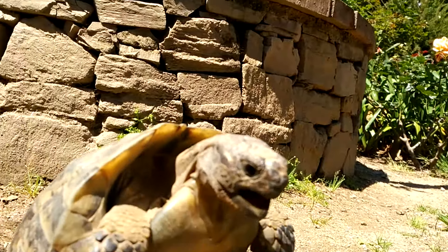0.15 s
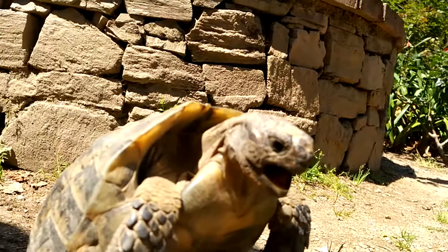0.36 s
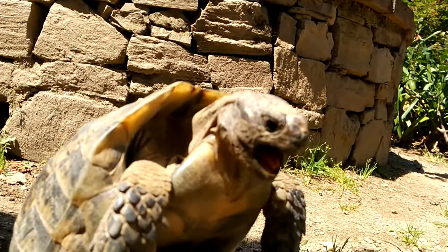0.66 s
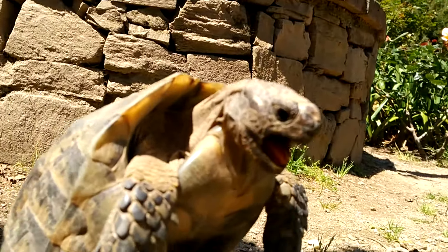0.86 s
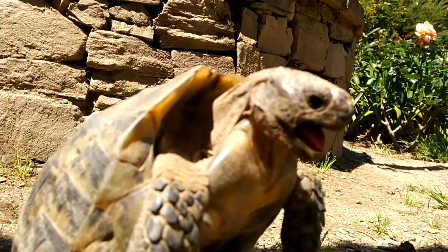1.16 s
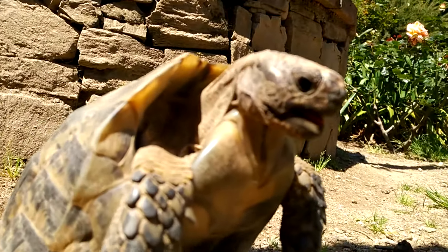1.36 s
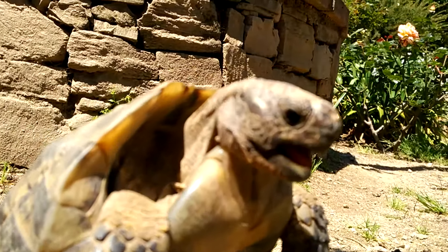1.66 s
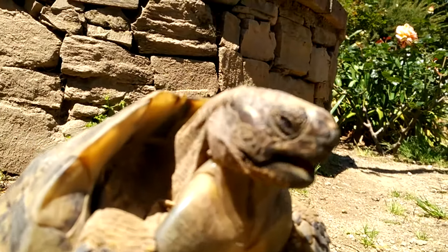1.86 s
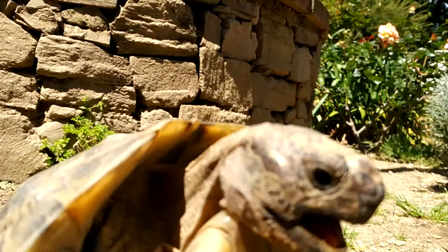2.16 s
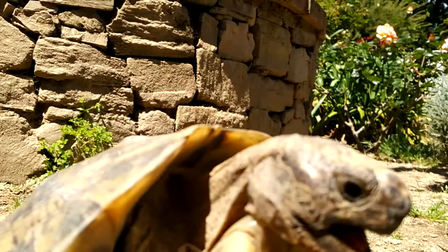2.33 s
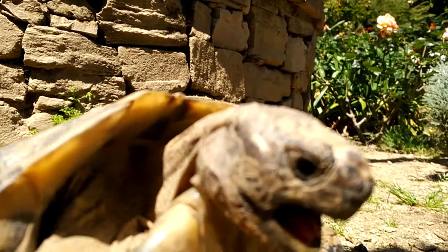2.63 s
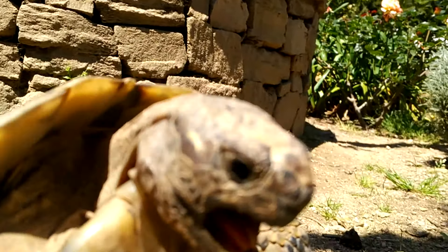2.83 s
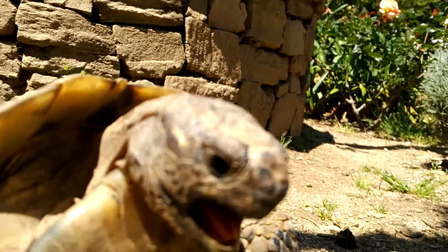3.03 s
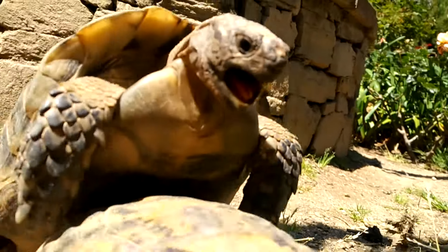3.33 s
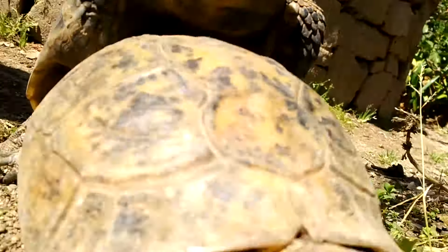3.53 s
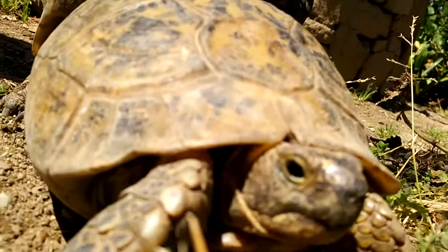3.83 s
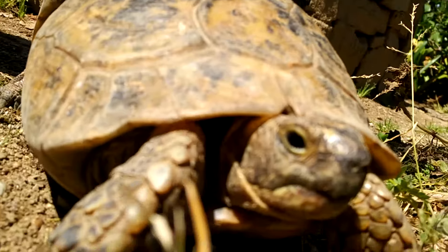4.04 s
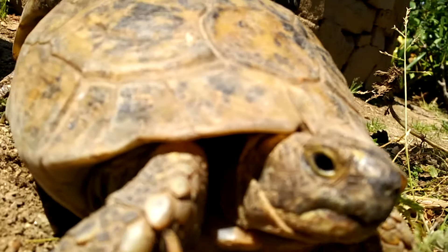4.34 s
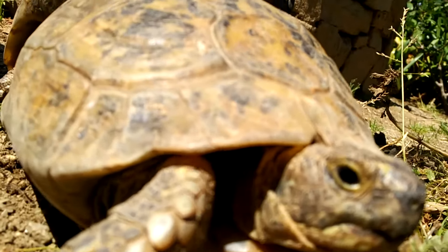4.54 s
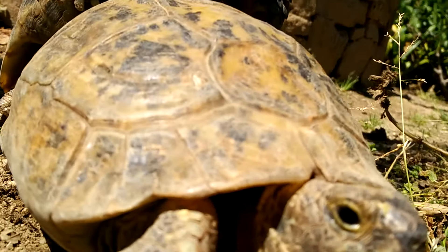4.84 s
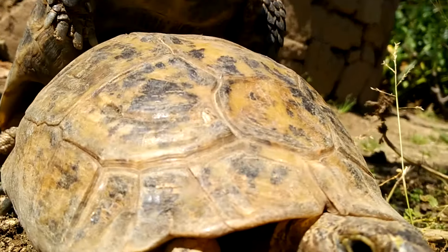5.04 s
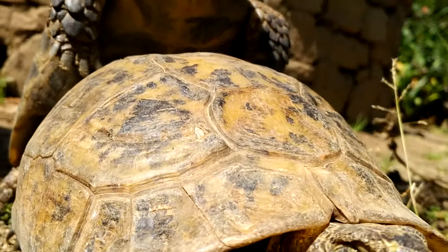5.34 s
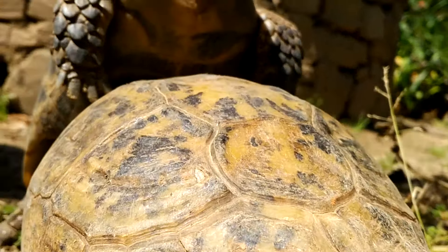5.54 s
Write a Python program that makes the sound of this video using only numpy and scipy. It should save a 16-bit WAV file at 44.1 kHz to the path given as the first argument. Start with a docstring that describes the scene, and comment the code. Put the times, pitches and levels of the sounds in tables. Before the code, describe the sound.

A tortoise gives two short, high, nasal squeaks about three seconds apart, with breathy hisses, dry grit ticks, light wind and distant low rumble.

```python
"""A tortoise squeaks twice in a sunny garden: gliding partials under a sliding mouth resonance.
It hisses during and after the squeaks, in noise swells; ground scuffs and the hoot's breathy body are made alike.
Ringing grains tick and spiky noise rustles, mostly at the left port of a phone. A sparrow chirps in burry sines,
another bird whistles, something hoots far off and a hollow knock rings.
Wind noise buffets the ports over distant traffic and a garden hush."""
import sys
import numpy as np
from scipy import signal
from scipy.fft import rfft, irfft
from scipy.io import wavfile
from scipy.ndimage import uniform_filter1d

SR = 44100
rng = np.random.default_rng(int(sys.argv[2]) if len(sys.argv) > 2 else 0)


def dump_mix(stems):
    """Bounce the given channels to the path in sys.argv[1] as a 16-bit WAV at rate SR."""
    frames = np.atleast_2d(stems).T  # one column per channel
    limited = np.clip(frames, -1, 1)  # hard clip at full scale
    pcm = np.round(limited * 32767).astype(np.int16)
    wavfile.write(sys.argv[1], SR, pcm)


N = 250929  # samples
RUSTLE_PAN_DB = 11  # left minus right, stalks and rasp of breath


def undb(db):
    """Decibels to amplitude."""
    return 10 ** (np.asarray(db) / 20)


def unit(x):
    """Scale to rms 1."""
    return x / np.sqrt(np.mean(x ** 2, axis=-1, keepdims=True))


def on_log(hz, table):
    """Read (hz, value) points on a log-frequency axis."""
    f, v = np.transpose(table)
    return np.interp(np.log(hz), np.log(f), v)


def colour(x, table):
    """Shape the spectrum by (hz, level_db) points, silent outside them; rms 1."""
    hz = np.fft.rfftfreq(x.shape[-1], 1 / SR) + 1  # offset avoids log 0
    band = (hz > table[0][0]) & (hz < table[-1][0])
    gain = undb(on_log(hz, table)) * band
    return unit(irfft(rfft(x) * gain, x.shape[-1]))


def noise(table, size, likeness=0.):
    """Two-port coloured noise of rms 1; likeness 1 is the same sound at both."""
    a, b = rng.standard_normal((2, size))
    like = np.clip(likeness, 0, 1)
    right = like * a + np.sqrt(1 - like ** 2) * b
    return colour(np.array([a, right]), table)


def pan(db):
    """Gains of the left and right port, db apart, whose mean is 1."""
    g = undb(db)
    return np.array([2 * g / (1 + g), 2 / (1 + g) + 0 * g])


def walk(rate_hz, size):
    """Random levels, each held 1 / rate_hz then slewed; rms 1."""
    k = int(SR / rate_hz)
    held = np.repeat(rng.standard_normal(size // k + 1), k)[:size]
    return unit(uniform_filter1d(held, k))


def add(out, start_s, x):
    """Mix x into out at start_s."""
    i = max(int(start_s * SR), 0)
    out[:, i:i + x.shape[-1]] += x[..., :N - i]


def follow(rows):
    """Columns of a table sample by sample over its span."""
    s, *columns = np.transpose(rows)
    t = np.arange(s[0], s[-1], 1 / SR)
    return [np.interp(t, s, c) for c in columns]


def everywhere(rows):
    """Columns of a table sample by sample over the whole scene."""
    s, *columns = np.transpose(rows)
    return [np.interp(np.arange(N) / SR, s, c) for c in columns]


def wind():
    """Low turbulence noise, nearly unrelated at the ports; the left one is exposed, the right sheltered."""
    # gusts at the left port: time_s, mean_level_db
    gusts = [(0.0, -62), (0.14, -48.5), (0.25, -54.5), (0.42, -54), (0.51, -36.5), (0.7, -41.5),
             (0.93, -54.5), (1.1, -46), (1.27, -57), (1.75, -57), (1.93, -48), (2.45, -51), (2.6, -66),
             (3.09, -55), (3.6, -73), (4.2, -56), (4.91, -68), (5.3, -64), (5.45, -49), (5.69, -55)]
    # wind spectrum: hz, level_db
    wind_spectrum = [(25, -48), (35, -6), (50, 1.5), (75, 2.5), (100, -11.5), (200, -25), (500, -73)]
    lee_db, lee_share = -66, .25  # right port: resting level, share of each gust's dB followed
    left_db = everywhere(gusts)[0]
    right_db = lee_db + lee_share * (left_db - lee_db)
    ports_db = np.array([left_db + 2.74 * walk(8, N), right_db + 3.0 * walk(4.1, N)])
    return undb(ports_db) * noise(wind_spectrum, N, likeness=.05)


def traffic():
    """Distant rumble in two bands of noise that swell apart, nearly the same at both ports."""
    # rumble levels: time_s, low_mean_db, upper_mean_db
    rumble = [(0.0, -61.5, -64), (0.15, -55.5, -72.5), (0.4, -58, -65), (0.52, -49, -67.5), (0.7, -51, -61),
              (0.81, -46.5, -64), (0.92, -54.5, -68.5), (1.33, -53, -68), (1.77, -56.5, -64.5),
              (2.19, -54.5, -67.5), (2.5, -54.5, -67), (2.7, -56.5, -65), (3.7, -58, -67),
              (3.96, -61.5, -69.5), (4.39, -56.5, -63.5), (4.86, -54.5, -68.5), (4.95, -49.5, -65),
              (5.05, -55, -62), (5.25, -52, -60.5), (5.36, -49, -60.5), (5.47, -50, -61),
              (5.69, -47.5, -61)]
    # low band: hz, level_db
    low_spectrum = [(60, -11), (90, -5), (125, -3), (160, -7), (210, -17.5), (260, -40)]
    # upper band: hz, level_db
    top_spectrum = [(160, 0.5), (210, -2), (330, 3), (400, -9), (480, -13.5), (700, -23), (1100, -24)]
    low_db, top_db = everywhere(rumble)
    low = undb(low_db + 1.4 * walk(7.4, N)) * noise(low_spectrum, N, likeness=.87)
    top = undb(top_db + 2.37 * walk(18, N)) * noise(top_spectrum, N, likeness=.86)
    return pan(1.6)[:, None] * (low + top)


def hush():
    """Steady diffuse garden noise."""
    # hush spectrum: hz, level_db
    hush_spectrum = [(240, -43), (400, -0.5), (625, -5.5), (2570, -10.5), (4410, -10), (4830, -9),
                     (7670, -9.5), (10600, -19), (15100, -13.5), (15800, -15)]
    return undb(-66.5) * noise(hush_spectrum, N, likeness=.099)


def rustle():
    """Dry stalks and grit crackle as spiky noise; dull and bright stalks stir apart."""
    # rustle: time_s, mean_level_db
    rustle_level = [(0.0, -58.5), (0.05, -52.5), (0.2, -68), (0.84, -73), (1.1, -78), (1.27, -54),
                    (1.42, -64), (2.26, -66), (2.42, -66.5), (2.55, -74), (2.84, -62.5), (3.09, -61.5),
                    (3.26, -69), (3.91, -71), (4.14, -71.5), (4.33, -58.5), (4.6, -59), (4.69, -71),
                    (4.88, -72.5), (5.69, -62)]
    # rustle spectrum: hz, level_db
    rustle_spectrum = [(2500, -11), (4500, -4), (5600, 1), (7000, 2.5), (9000, 1.5), (12000, -3.5),
                       (15900, -16)]
    spike_db, stir_db, split_hz = 3, 2, 7500
    spikes = rng.standard_normal((2, N)) * undb(spike_db * rng.exponential(size=(2, N)))
    crackle = colour(spikes, rustle_spectrum)
    dull = signal.sosfilt(signal.butter(4, split_hz, fs=SR, output="sos"), crackle)
    bright = crackle - dull
    stirred = dull * undb(stir_db * walk(25, N)) + bright * undb(stir_db * walk(25.04, N))
    level_db = everywhere(rustle_level)[0] + 1.24 * walk(60, N)
    return undb(level_db) * pan(RUSTLE_PAN_DB)[:, None] * stirred


def snap(bright_db):
    """One grain of grit rings its decaying modes, peak 1; each grain is sized and struck differently."""
    # grain modes: nominal_hz, nominal_level_db, t60_s
    modes = [(3520, -33, 0.0022), (6000, -6, 0.0013), (7670, 5, 0.0023), (9460, 11, 0.0055),
             (10840, 20, 0.0025), (13880, 14.5, 0.0024), (16000, 4, 0.00093)]
    spread_db, detune = 3, .06  # rms scatter of level and, as a fraction, of pitch
    t = np.arange(int(.008 * SR)) / SR
    ring = np.zeros(len(t))
    for (hz, db, t60_s), (c, d) in zip(modes, rng.standard_normal((len(modes), 2))):
        gain = undb(db + spread_db * c + bright_db * (hz > 8000))
        decay = np.exp(-np.log(1000) * t / t60_s)
        ring += gain * decay * np.sin(2 * np.pi * hz * (1 + detune * d) * t)
    ring = ring * np.minimum(t / 0.000074, 1)  # contact builds over a few samples
    return ring / np.abs(ring).max()


def ticks():
    """Grains of grit snap at set moments, and more snap faintly at chance moments."""
    # snaps: start_s, peak_db (mean of ports), bright_db (modes above 8 kHz)
    snaps = [(0.0577, -23.5, -12), (0.0641, -42, -9), (0.1641, -43, -11), (0.3684, -34.5, -55),
             (1.0811, -32.5, -24), (1.5142, -42, -22), (2.0408, -42.5, -19), (2.1496, -38, -23),
             (2.1712, -38, -6), (2.2187, -33.5, -12), (2.4325, -39.5, -23), (2.607, -43, -3),
             (2.8644, -42.5, -15), (2.997, -44, -7), (3.0796, -43, -18), (3.5889, -31, -11),
             (3.61, -41, -25), (3.6904, -40, -14), (3.8662, -41, -11.5), (4.1247, -28, 0),
             (4.2143, -44.5, -37), (4.2683, -36.5, -17), (4.303, -22, -16.5), (4.3483, -31.5, -16),
             (4.5797, -24.5, -3), (5.2271, -31.5, 4), (5.4001, -41, -21), (5.534, -25.5, 10),
             (5.6044, -37, -15), (5.6487, -39.5, -26)]
    faint_count, faint_db, faint_bright_db = 10, -47, -14
    faint = [(s, faint_db, faint_bright_db) for s in rng.random(faint_count) * N / SR]
    out = np.zeros((2, N))
    for start_s, db, bright_db in snaps + faint:
        add(out, start_s, undb(db) * pan(17)[:, None] * snap(bright_db))
    return out


def puffs(rows, grain_db):
    """Swells of noise in one broad resonance, their graininess set by grain_db."""
    taper, waver_db = 1.3, 1.2  # taper above 1 points the swells
    out = np.zeros((2, N))
    for start_s, top_s, end_s, db, hz, width_hz, pan_db, likeness in rows:
        t = np.arange(start_s, end_s, 1 / SR)
        rise_fall = np.interp(t, [start_s, top_s, end_s], [0, 1, 0])
        swell = np.sin(np.pi / 2 * rise_fall) ** taper
        swell = swell * undb(waver_db * walk(29.76, len(t)))
        f = np.geomspace(120, 15900, num=80)
        resonance = np.c_[f, -30 * np.log10(1 + (2 * (f - hz) / width_hz) ** 2)]
        grain = undb(grain_db * walk(300, len(t)))
        hiss = noise(resonance, len(t), likeness)
        add(out, start_s, undb(db) * swell * grain * pan(pan_db)[:, None] * hiss)
    return out


def scuffs_and_hoot_breath():
    """Feet and shells scuff the dry ground; the low swell at 3.81 s is the hoot's breathy body: grainy noise."""
    # swells: start_s, peak_s, end_s, level_db, centre_hz, width_hz (at -9 dB), left_minus_right_db, likeness
    swell_rows = [(0.04, 0.06, 0.09, -43.5, 10500, 9300, 17, 0.52),
                  (2.25, 2.262, 2.277, -52.5, 3080, 4000, 7.6, 0.85),
                  (2.85, 3.0, 3.18, -71, 8350, 6100, 14, 0.28),
                  (3.18, 3.222, 3.26, -51.5, 7800, 9300, 7.6, 0.31),
                  (3.48, 3.515, 3.6, -60, 6200, 5650, 5.6, 0.12),
                  (3.81, 3.88, 4.07, -59.5, 387, 850, 2.4, 0.52),
                  (5.21, 5.232, 5.26, -60, 5460, 4000, 2.7, 0.55),
                  (5.64, 5.65, 5.66, -56.5, 6400, 6560, 6.8, 0.45)]
    return puffs(swell_rows, grain_db=3)


def squeak(rows, second_db, upper_db, rasp_db):
    """Clean partials; a mouth resonance slides over the upper ones; breath rasps in puffs each cycle."""
    # throat, third partial up: hz, gain_db
    throat_gain = [(2130, -4), (2260, 2.5), (2340, -12), (2800, 3), (3100, -2), (3600, 1.5), (3900, -5.5),
                   (4300, -1), (4700, 7.5), (5050, -3), (5450, -5.5), (7000, -19), (7800, -6), (8600, -13),
                   (9500, -28)]
    # the hand shades the ports: hz, left_minus_right_db
    hand_shade = [(700, 0.5), (1500, 5), (2300, 1), (3100, 9.5), (3900, 17.5), (4600, -2.5), (5500, -2.5),
                  (7000, 10), (9000, 25)]
    # rasp spectrum: hz, level_db
    rasp_spectrum = [(5200, -47), (5800, 7), (8000, 4), (11000, 5), (14000, 4), (15900, -8)]
    jitter, shimmer_db = .0015, 2  # rms: fraction of pitch, level of upper partials
    onset_bright_db, onset_fade_s = 3.5, 0.07  # extra edge at the start
    upper_fade_db_per_s = 12  # throat's share of the upper partials tires sooner than the fundamental
    mouth_width_hz, mouth_skirt = 1300, 1.5
    second_lag_rad = 0.39 * np.array([[0], [1]])  # second partial is later still at the shaded right port
    hz, level_db, mouth_hz, mouth_db = follow(rows)
    hz, mouth_hz = (uniform_filter1d(c, int(0.005 * SR), mode="nearest") for c in (hz, mouth_hz))
    size = len(hz)
    t = np.arange(size) / SR
    onset = np.exp(-t / onset_fade_s)
    phase = 2 * np.pi * np.cumsum(hz * (1 + jitter * walk(154.6, size))) / SR

    rasp = undb(level_db + rasp_db) * pan(RUSTLE_PAN_DB)[:, None] * noise(rasp_spectrum, size, 0.28)
    out = rasp * (1 + 0.41 * np.cos(phase)) * undb(2.0 * walk(75, size))
    for k in range(1, 14):
        f = k * hz
        if k > 2:
            mouth = undb(mouth_db) / (1 + (2 * (f - mouth_hz) / mouth_width_hz) ** 2) ** mouth_skirt
            tilt_db = upper_db + onset_bright_db * onset - upper_fade_db_per_s * t
            throat = undb(level_db + tilt_db + on_log(f, throat_gain))
            gain = (throat + mouth) * undb(shimmer_db * walk(46.3, size))
        else:
            gain = undb(level_db + second_db * (k == 2))
        tone = np.sin(k * phase + k * k / 3 - second_lag_rad * (k == 2))
        out = out + np.sqrt(2) * gain * pan(on_log(f, hand_shade)) * tone
    return out


def squeaks():
    """Each squeak of the tortoise follows its own pitch and mouth track, with its own colour."""
    # one track per squeak: time_s, pitch_hz, fundamental_db, mouth_hz, mouth_peak_db
    tracks = [
        [(0.972, 856, -116, 5650, -94), (0.986, 818, -57, 5930, -43), (1.008, 782, -53, 5560, -40.5),
         (1.045, 776.2, -50.5, 6840, -49), (1.16, 780.8, -51, 7240, -51.5), (1.19, 777, -51, 6240, -52.5),
         (1.24, 773, -51.5, 6040, -52), (1.263, 754, -51, 6100, -53), (1.285, 725.5, -53, 5850, -53),
         (1.333, 705, -56.5, 5650, -53), (1.39, 713.4, -55, 5660, -72), (1.42, 702, -56, 5650, -79),
         (1.458, 677, -73, 5620, -85)],
        [(4.358, 830, -63.5, 6300, -66), (4.374, 746, -48, 6400, -40.5), (4.4, 714, -48, 6120, -42),
         (4.445, 697.5, -50, 6600, -49.5), (4.49, 713, -49.5, 6800, -47), (4.52, 724, -50, 6130, -50.5),
         (4.552, 744, -52.5, 5930, -50.5), (4.576, 721, -55, 6160, -59), (4.622, 695, -79, 6200, -79)],
    ]
    # colour per squeak, against its fundamental: second_partial_db, upper_partials_db, rasp_db
    shades = [(6.5, -5, -8.5), (-2, -12, -6.5)]
    out = np.zeros((2, N))
    for rows, shade in zip(tracks, shades):
        add(out, rows[0][0], squeak(rows, *shade))
    return out


def hisses():
    """Breath through the tortoise's nose and mouth: slightly grainy noise swells."""
    # hisses: start_s, peak_s, end_s, level_db, centre_hz, width_hz (at -9 dB), left_minus_right_db, likeness
    hiss_rows = [(0.99, 1.12, 1.25, -53, 6000, 2050, 3, 0),
                 (1.12, 1.42, 2.05, -58.5, 4540, 2770, -0.5, 0.06),
                 (2.14, 2.235, 2.43, -53.5, 5670, 1290, -1.5, 0.1),
                 (2.05, 2.25, 2.4, -60.5, 7440, 3640, 9, 0.2), (4.5, 4.6, 4.72, -63.5, 8100, 4000, 10, 0.1),
                 (5.4, 5.54, 5.63, -55, 6800, 2470, 7.5, 0.4)]
    return puffs(hiss_rows, grain_db=1.9)


def sparrow():
    """Burry gliding sines, three strokes to a chirp, smeared by echoes from leaves and walls."""
    # one track per stroke: time_after_start_s, hz (before pitch_factor), level_db (relative to chirp)
    strokes = [
        [(-.006, 3700, -2.5), (.01, 4490, 7.5), (.026, 4484, 11), (.04, 4136, 9), (.056, 4070, 5),
         (.064, 4000, -2)],
        [(.05, 3150, -7), (.068, 3600, 5), (.085, 4120, 9), (.1, 3725, -3), (.14, 4010, -2.5), (.16, 3900, -15)],
        [(.09, 2990, -11), (.1, 3100, 0), (.115, 3700, 1.5), (.13, 2900, -7.5), (.15, 3247, -17)],
    ]
    # chirps: start_s, level_db, pitch_factor, echo_db
    chirps = [(2.655, -72.5, 0.97, 10), (4.082, -62.5, 1.0, 5), (4.85, -62, 0.99, 5)]
    burr_hz, burr = 120, .7  # rms fast unsteadiness of pitch and, as a fraction, of size
    bush_t60_s = .19
    out = np.zeros((2, N))
    t = np.arange(int(.3 * SR)) / SR
    for start_s, chirp_db, pitch, echo_db in chirps:
        echo = rng.standard_normal((2, len(t))) * np.exp(-np.log(1000) * t / bush_t60_s)
        echo *= undb(echo_db) / np.sqrt(np.sum(echo ** 2, axis=1, keepdims=True))
        echo[:, 0] = 1  # direct sound
        for rows in strokes:
            hz, db = follow(rows)
            level = undb(db + chirp_db) * (1 + burr * walk(300, len(hz)))
            burry_hz = pitch * hz + burr_hz * walk(600, len(hz))
            tone = level * np.sin(2 * np.pi * np.cumsum(burry_hz) / SR)
            smeared = signal.fftconvolve(echo, tone[None], axes=1)
            add(out, start_s + rows[0][0], pan(-1.6)[:, None] * smeared)
    return out


def hoot():
    """Far husky low tone: a few partials, each roughened in level."""
    # hoot: time_s, pitch_hz, level_db
    hoot_track = [(3.811, 280, -69), (3.848, 377.4, -61.5), (3.858, 386, -61), (3.884, 367.4, -54.5),
                  (3.964, 384.4, -65), (4.05, 376, -76)]
    # partials from the fundamental up: gain_db
    partials_db = [4.5, -11.5, -24, -26]
    rough = undb(-8.5)  # times the partial number
    hz, db = follow(hoot_track)
    phase = 2 * np.pi * np.cumsum(hz) / SR
    tone = np.zeros(len(hz))
    for k, partial_db in enumerate(partials_db, 1):
        tone += undb(partial_db) * (1 + k * rough * walk(149.7, len(hz))) * np.sin(k * phase)
    out = np.zeros((2, N))
    add(out, hoot_track[0][0], np.sqrt(2) * undb(db) * tone * pan(1.2)[:, None])
    return out


def knock():
    """One hollow knock: a soft-edged decaying sine."""
    # knock: level_db (before attack and decay), hz, t60_s
    knock_ring = (-43, 265, .16)
    db, hz, t60_s = knock_ring
    t = np.arange(int(t60_s * SR)) / SR
    envelope = np.minimum(t / .012, 1) * np.exp(-np.log(1000) * t / t60_s)
    out = np.zeros((2, N))
    add(out, 4.988, undb(db) * envelope * np.sin(2 * np.pi * hz * t))
    return out


def whistle():
    """A second bird, far off: one thin gliding sine."""
    # whistle: time_s, pitch_hz, peak_db (mean of ports)
    whistle_track = [(5.0, 6300, -84), (5.012, 6500, -61), (5.02, 7150, -70), (5.059, 7030, -70),
                     (5.09, 7000, -65), (5.115, 6500, -77)]
    hz, db = follow(whistle_track)
    tone = undb(db) * np.sin(2 * np.pi * np.cumsum(hz) / SR)
    out = np.zeros((2, N))
    add(out, whistle_track[0][0], tone * pan(3.6)[:, None])
    return out


def scene():
    """Sum of all sources at the two ports."""
    ambience = wind() + traffic() + hush()
    grit = rustle() + ticks()
    tortoise = squeaks() + hisses()
    distance = sparrow() + hoot() + knock() + whistle()
    return ambience + grit + scuffs_and_hoot_breath() + tortoise + distance


def record(dry):
    """The right port hears everything slightly late; the phone cuts the top."""
    port_lag_s, top_hz = 0.00012, 16600
    lag_s = port_lag_s * np.array([[0], [1]])
    late = irfft(rfft(dry) * np.exp(-2j * np.pi * np.fft.rfftfreq(N, 1 / SR) * lag_s), N)
    return signal.sosfilt(signal.ellip(10, .2, 75, top_hz, fs=SR, output="sos"), late)


dry = scene()
out = record(dry)
dump_mix(out)
```